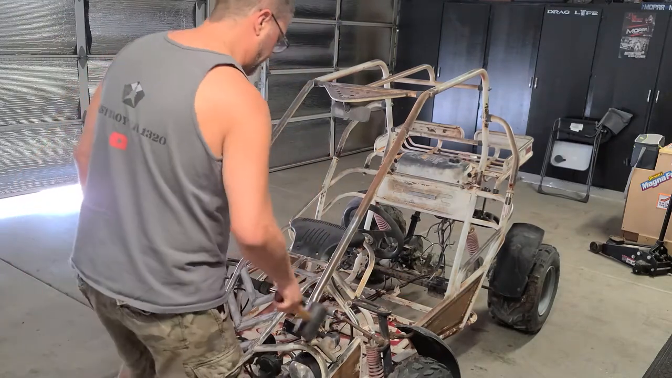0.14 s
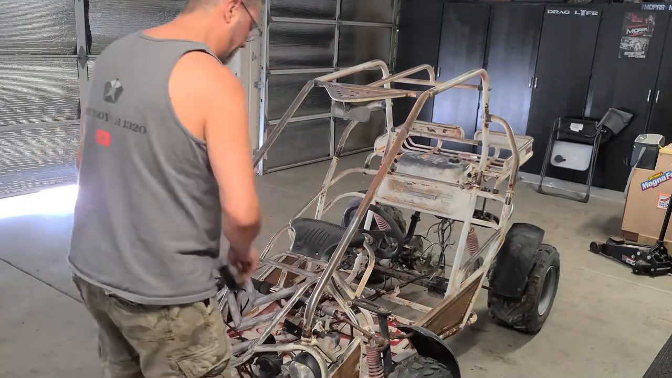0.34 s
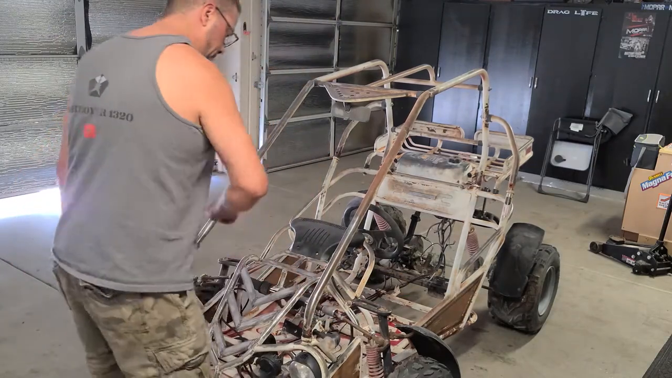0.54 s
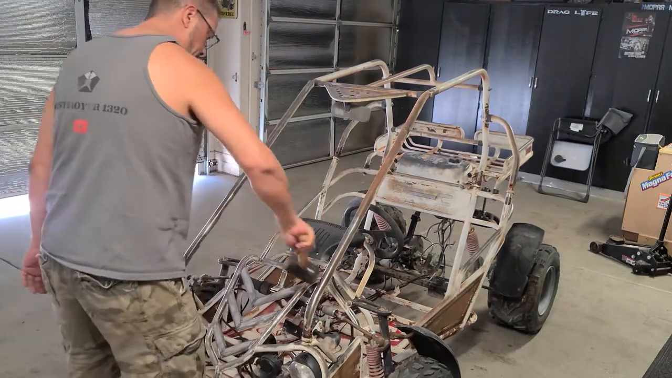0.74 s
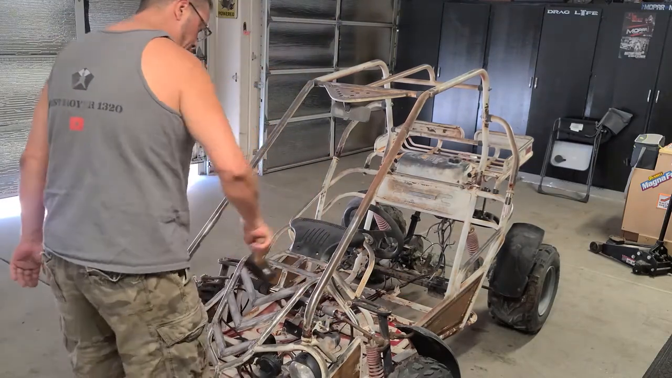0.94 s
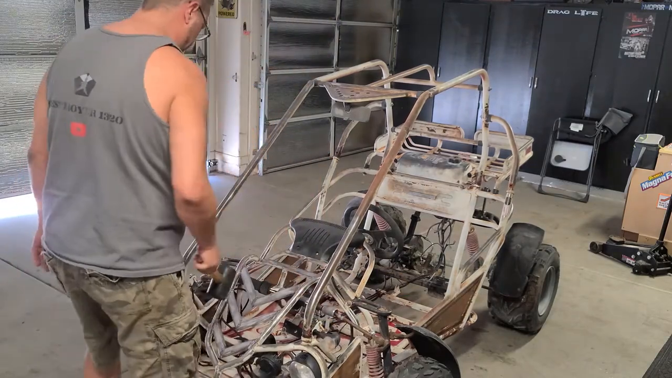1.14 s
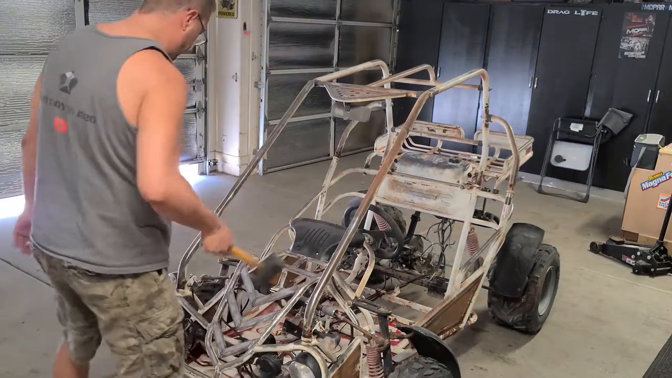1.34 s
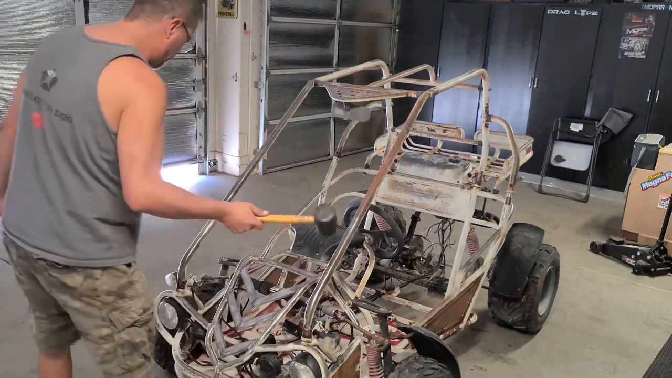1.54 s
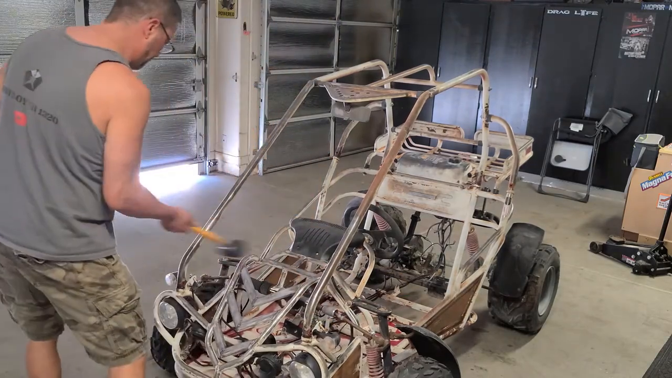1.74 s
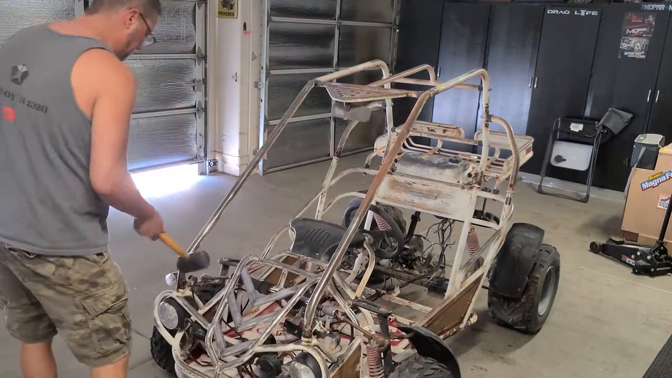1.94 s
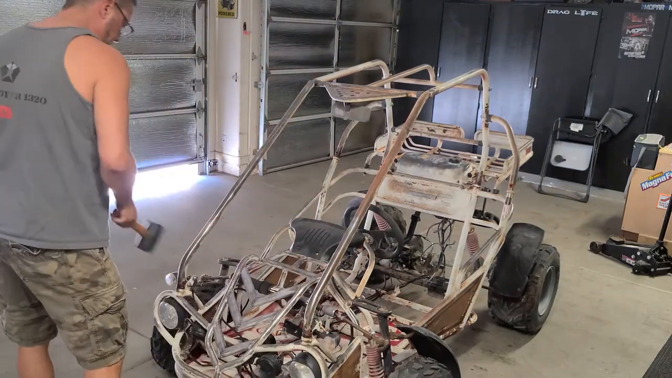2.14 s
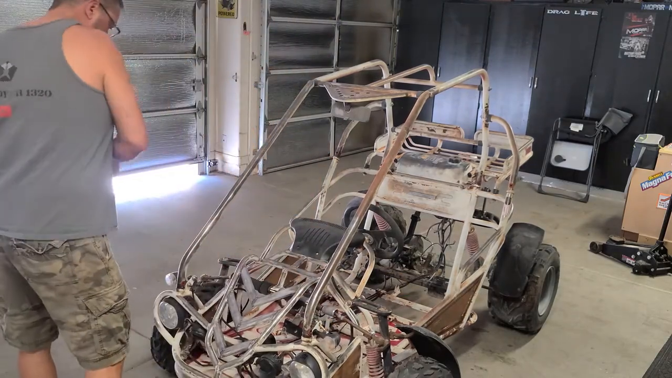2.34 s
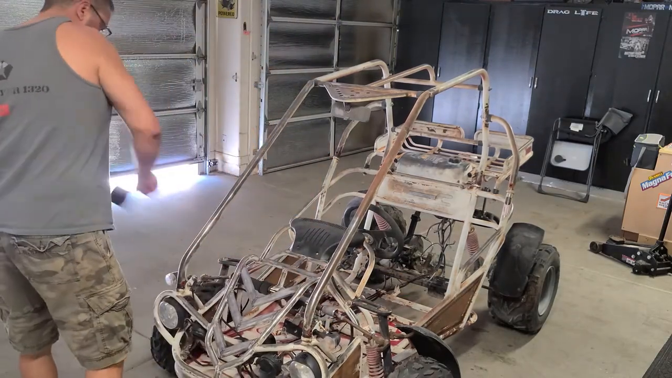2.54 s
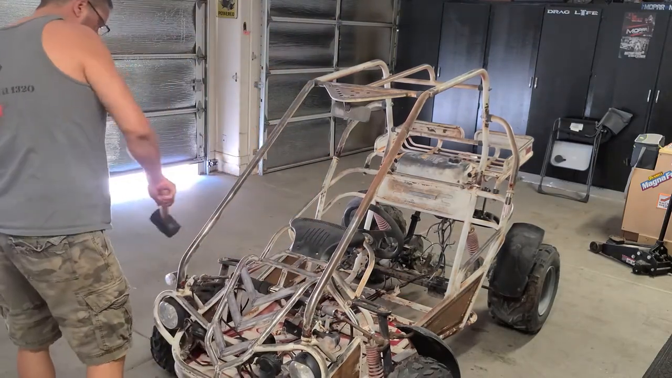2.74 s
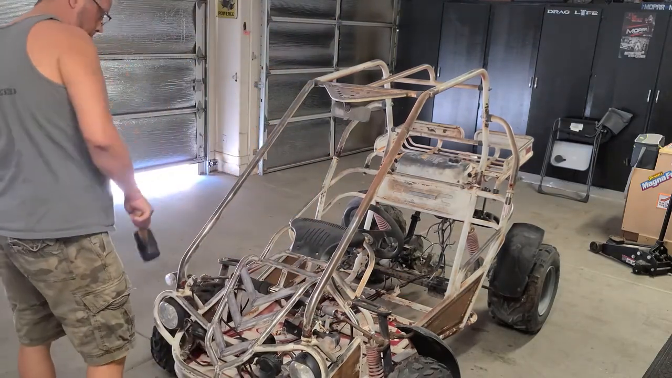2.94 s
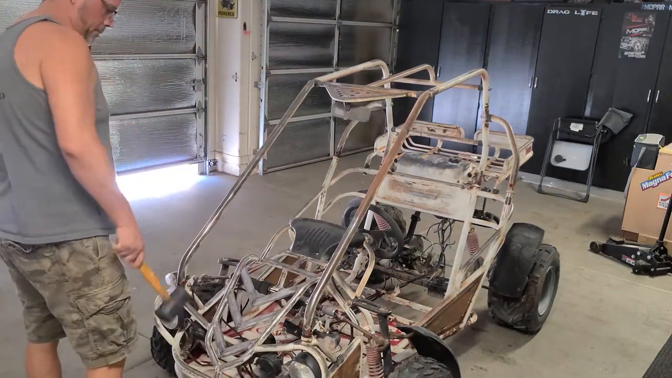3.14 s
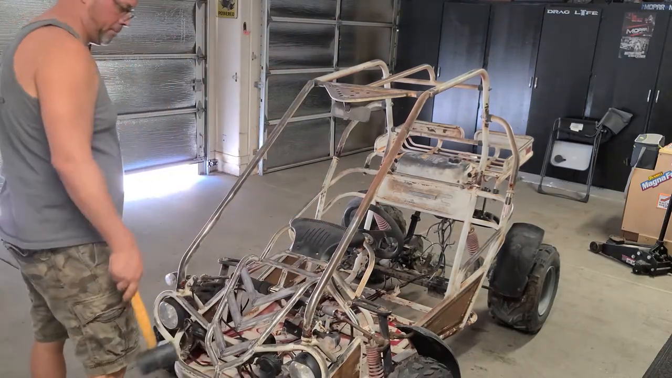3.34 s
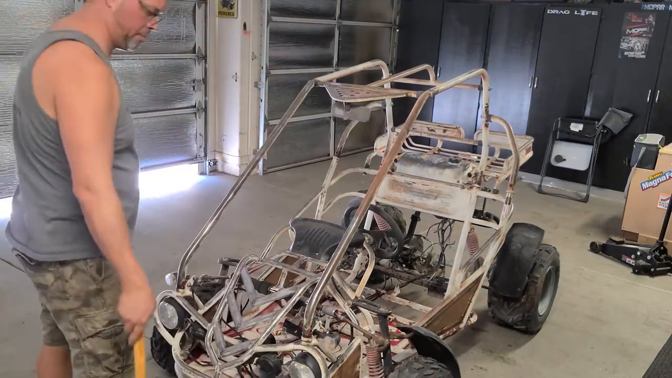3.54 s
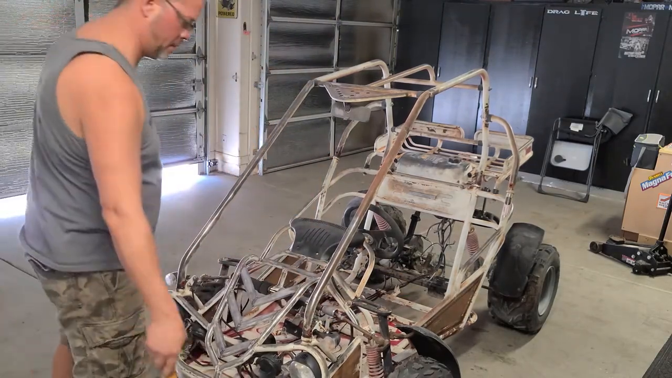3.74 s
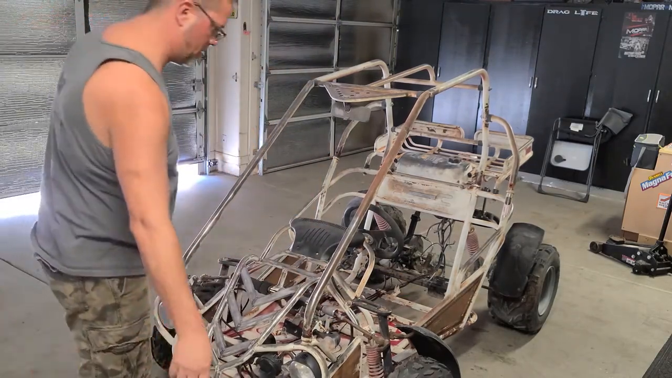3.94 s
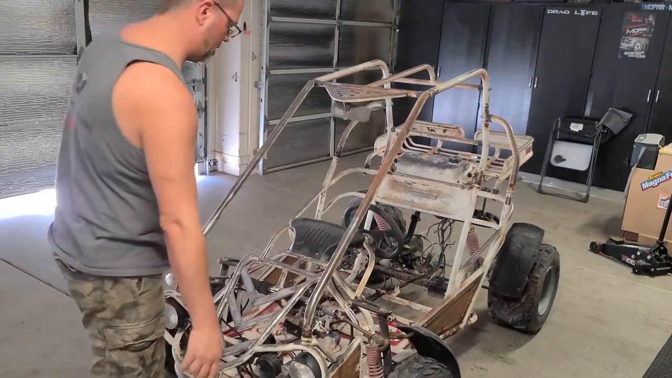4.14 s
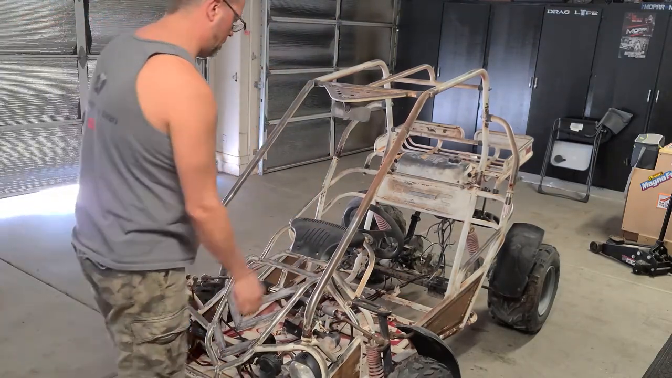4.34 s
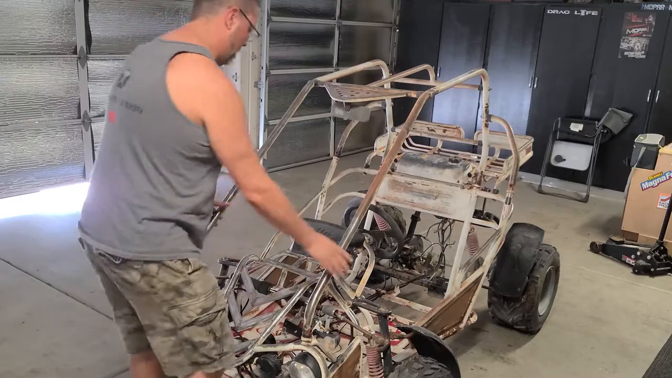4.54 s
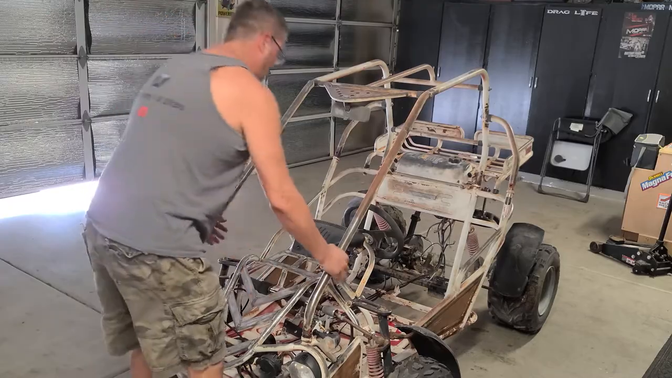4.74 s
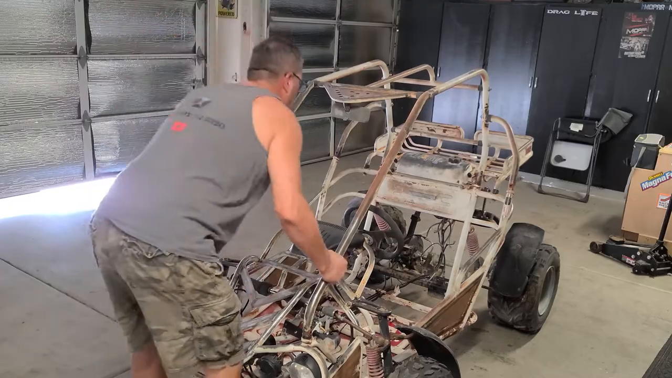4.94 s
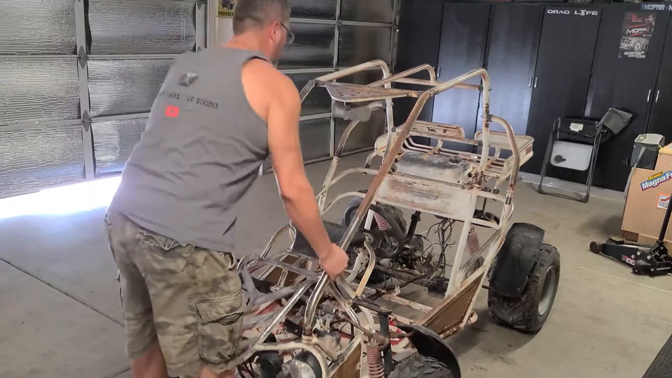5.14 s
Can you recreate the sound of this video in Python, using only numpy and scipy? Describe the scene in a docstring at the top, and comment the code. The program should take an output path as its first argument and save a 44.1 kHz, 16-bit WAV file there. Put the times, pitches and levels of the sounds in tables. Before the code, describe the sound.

Hard, hollow metallic clangs ring through a concrete garage over a fan's hum, followed by duller knocks, soft steps and a small squeak.

```python
"""In a closed garage, a rubber mallet hits the welded tube frame of a buggy; the first blow is already dying away.
Each blow mixes bursts of shaped noise (tick, crack, clatter, shimmer, thud) with beating sine tones for the tubes.
Fading noise makes the room's answer, and an automatic gain control sinks after each blow and creeps back.
Short noises make shoe scuffs, soft steps and the knocks of the mallet put down; a few sines make a faint squeak.
Behind it all are steady noises: a fan's rush and whine and a low rumble."""
import sys
import numpy as np
from scipy import signal
from scipy.fft import rfft, irfft, next_fast_len
from scipy.io import wavfile
from scipy.ndimage import uniform_filter1d

SR = 44100
rng = np.random.default_rng(int(sys.argv[2]) if len(sys.argv) > 2 else 0)


def master(y):
    """Save y as 16-bit WAV."""
    cut = np.clip(np.atleast_2d(y).T, -1, 1)
    pcm = np.round(cut * 32767)  # scale
    wavfile.write(sys.argv[1], SR, pcm.astype(np.int16))


N = 228386
LEAD = SR // 4  # samples of sound before time zero

# In every noise colour below, level_db is relative: the noise is scaled to an even strength afterwards.
# colour of the fan's rush: pitch_hz, level_db
FAN_COLOUR = [(50, -24.5), (90, -8.5), (200, -6), (300, -3.5), (370, -5), (520, -3), (700, -12),
              (1000, -14.5), (1400, -15.5), (2050, -17), (2500, -24.5), (4000, -34), (7000, -47.5),
              (16000, -59)]
# colour of the low rumble, also used for footfalls: pitch_hz, level_db
RUMBLE_COLOUR = [(22, -18), (32, -7.5), (44, 3), (60, 1), (85, -14), (130, -5.5), (220, -2), (500, -54)]
# time the garage takes to fall by 60 dB: pitch_hz, t60_s
GARAGE_T60 = [(180, 1), (430, 0.83), (1040, 0.87), (2500, 0.65), (6000, 0.46), (14400, 0.32)]
# likeness of left and right (1 = same, 0 = unrelated) for far sound: pitch_hz, likeness
FAR_LIKENESS = [(60, 0.92), (290, 0.9), (640, 0.52), (1410, -0.034), (3100, 0.11), (15000, -0.12)]
# the same for near sound: pitch_hz, likeness
NEAR_LIKENESS = [(60, 0.34), (300, 1), (700, 0.82), (1500, 0.7), (4400, 0.038), (15000, .1)]
# shoe scuffs; each is strongest after half its length: start_s, level_db, length_s
SCUFFS = [(1.343, -45, 0.047), (1.645, -47.5, 0.22), (3.43, -56, 0.024), (3.738, -47.5, 0.028),
          (4.689, -51, 0.053), (4.922, -60.5, 0.04), (5.138, -48.5, 0.074)]
# colour of a scuff: pitch_hz, level_db
SCUFF_COLOUR = [(1000, -12.5), (3000, 1), (6000, -2), (12000, -3.5), (16000, -10.5)]
# soft footfalls: start_s, level_db
FOOTFALLS = [(3.915, -30), (4.01, -30.5), (4.495, -28.5), (4.915, -41)]
# faint thin squeak: pitch_hz, level_db
SQUEAK = [(6860, -72), (6890, -72), (9485, -73), (12130, -93)]
# mallet put down, hand on the frame: start_s, level_db, tilt_db_per_octave, low_edge_hz, rise_s, t60_s
KNOCKS = [(4.233, -10, -0.74, 40, 0.0007, 0.12), (4.267, -14, 2.5, 60, 0.0013, 0.046),
          (4.483, -18, -1, 251, 0.002, 0.058), (4.768, -31, 2, 200, 0.0025, .05),
          (5.164, -13, -9, 418, 0.011, 0.083)]
# colour of a knock: pitch_hz, level_db
KNOCK_COLOUR = [(40, 1), (80, -8), (130, -8), (220, 9), (360, -1), (520, 1.5), (690, -0.5), (1000, 1),
                (1500, -12.5), (2300, -7.5), (3600, -20), (4900, -20), (8000, -35.5), (15000, -46)]
# colour of the chassis thud: pitch_hz, level_db
THUD_COLOUR = [(35, -33), (70, -9), (125, 11), (170, 6.5), (300, -36.5), (600, -69)]
# mallet blows; each layer shifts the ring or crack level by its own step:
# start_s, ring_db, crack_db, tilt_db_per_octave, striking_spot (0-2), thud_db, thud_peak_s (after start)
BLOWS = [(-0.117, 11.5, 14, -0.5, 0, -18.5, 0.057), (0.7598, 11.5, 8.5, -0.05, 0, -16, .058),
         (1.801, 12, 10.5, -0.27, 1, -18, 0.05), (2.6367, 14, 12, -0.08, 2, -22, 0.049)]
# ringing of the tube frame: pitch_hz, t60_s, first_spot_db, second_spot_db, third_spot_db
FRAME = [(202.9, 0.87, -20, -18, -22), (219.1, 1, -29, -23.5, -24.5), (254.6, 0.97, -19, -23.5, -24),
         (279.2, 0.77, -17.5, -22.5, -19), (292, 0.95, -22.5, -20.5, -20.5), (336.7, 1, -21, -37.5, -21),
         (388.3, 0.93, -19.5, -36, -19), (418, 0.7, -12.5, -17.5, -12.5),
         (430.3, 0.87, -25.5, -22.5, -20.5), (510.3, 0.86, -28.5, -26, -34.5),
         (557.6, 1, -25, -23.5, -24.5), (567.6, 0.55, -17, -10, -41), (597.6, 0.54, -21.5, -18, -12.5),
         (626, 0.69, -17, -19.5, -19.5), (712, 0.81, -51, -24, -29), (757, 0.65, -25, -45, -42),
         (982, 0.93, -29, -33, -31), (1153, .45, -40.5, -20.5, -30), (1197, 0.5, -29.5, -28.5, -30.5),
         (1250, 0.32, -32, -43, -20.5), (1654, .4, -46, -32, -36.5), (1740, 0.37, -36.5, -44, -34),
         (1700, 0.55, -37, -34, -23.5), (2660, 0.28, -32, -24.5, -24), (3180, 0.31, -41.5, -37, -27)]
# colour of the tick at first touch: pitch_hz, level_db
TICK_COLOUR = [(500, -6.5), (2500, 2.5), (6000, -5), (11000, -7), (16000, -4)]
# colour of the crack of contact: pitch_hz, level_db
CRACK_COLOUR = [(60, -43.5), (140, -11), (220, -1.5), (400, 5.5), (650, 3), (1200, 2), (1900, -10.5),
                (3200, -11.5), (6000, -26), (11000, -18.5), (16000, -20)]
# colour of the crowded, short-lived ringing of panels and fittings: pitch_hz, level_db
CLATTER_COLOUR = [(40, -38.5), (90, -22), (145, -17), (205, 3), (440, -9), (650, 6.5), (850, -11),
                  (1300, -10.5), (1900, -2), (2500, -30), (3800, -30), (6000, -19.5), (11000, -21),
                  (16000, -34)]
# how long that clatter lasts: pitch_hz, t60_s
CLATTER_T60 = [(180, 0.054), (500, 0.18), (2000, 0.092), (12000, 0.27)]
# colour of small steel fittings: pitch_hz, level_db
SHIMMER_COLOUR = [(4500, -51.5), (5600, -22), (5880, 2), (6020, -9), (6250, -17), (6760, -15.5),
                  (7200, -17), (7700, -19), (9000, -52.5)]
# colour of a blow as the walls return it: pitch_hz, level_db
WASH_COLOUR = [(40, -36.5), (90, -16.5), (145, -17), (200, -2), (420, 0), (610, -1), (850, -6), (1250, -5),
               (1500, -8.5), (1900, -7.5), (3300, -17.5), (6000, -23), (11000, -25), (16000, -31)]

FAN_DB, RUMBLE_DB = -36.5, -44.5
FAN_WHINE_HZ, FAN_WHINE_DB = 923.5, -46.5
FOOTFALL_RISE_S, FOOTFALL_T60_S = 0.0049, 0.45
# gain control: loud sound is held to the limit, then the gain creeps back
LIMIT_DB, RECOVERY_DB_PER_S = -6.0, 4.5
DETECTOR_S, LOOK_AHEAD_S = 0.031, 0.0083
CUTOFF_HZ = 15900


def from_db(db):
    """Turn decibels into a gain."""
    return 10 ** (np.asarray(db) / 20)


def at_hz(points, hz):
    """Read a table between its points, with pitch spaced evenly by octave."""
    point_hz, value = np.transpose(points)
    return np.interp(np.log(hz), np.log(point_hz), value)


def seconds(length_s):
    """Make a time axis of the given length."""
    return np.arange(int(length_s * SR)) / SR


def silence():
    """Make an empty stereo track, lead-in included."""
    return np.zeros((2, LEAD + N))


def decay(t, t60_s):
    """Fade steadily, losing 60 dB in t60_s."""
    return np.exp(-np.log(1000) * t / t60_s)


def add(track, start_s, sound):
    """Mix a sound into the track at its start time."""
    at = max(LEAD + round(start_s * SR), 0)
    part = sound[:, :max(track.shape[1] - at, 0)]
    track[:, at:at + part.shape[1]] += part


def noise(colour, likeness, size, tilt_db=0):
    """Stereo noise scaled to rms 1, then tilted about 1 kHz; likeness sets how much the sides share."""
    padded = next_fast_len(size, True)
    hz = np.maximum(np.fft.rfftfreq(padded, 1 / SR), 1)
    gain = from_db(at_hz(colour, hz))
    gain = gain / np.sqrt(2 * np.mean(gain ** 2))
    # the tilt stays level below 250 Hz
    gain = gain * from_db(tilt_db * np.log2(np.maximum(hz, 250) / 1000))
    alike = np.clip(at_hz(likeness, hz), -.99, .99)
    mid, side = rfft(rng.standard_normal((2, padded)))
    shared = np.sqrt(1 + alike) * mid
    opposed = np.sqrt(1 - alike) * side * [[1], [-1]]
    return irfft(gain * (shared + opposed), padded)[:, :size]


def dying(sound, t60_table, count=6):
    """Split a sound into overlapping pitch bands that each die at their own rate."""
    t, spectrum = np.arange(sound.shape[1]) / SR, rfft(sound)
    centres_hz = np.geomspace(180, 14400, count)
    log_hz = np.log(np.maximum(np.fft.rfftfreq(len(t), 1 / SR), 1))
    out = np.zeros_like(sound)
    for share, centre_hz in zip(np.eye(count), centres_hz):
        weight = np.interp(log_hz, np.log(centres_hz), share)
        out += irfft(spectrum * weight, len(t)) * decay(t, at_hz(t60_table, centre_hz))
    return out


def bunched(colour, ripple_db=3.0, count=240):
    """Crowded modes bunch at random into small peaks and dips; the ripple grows with pitch up to 1 kHz."""
    hz = np.geomspace(40, 16000, count)
    ripple = ripple_db * np.minimum(hz / 1000, 1) * np.clip(rng.standard_normal(count), -2, 2)
    return np.column_stack([hz, at_hz(colour, hz) + ripple])


def garage(t, colour, tilt_db=0, first_wall_s=0.0078, build_s=0.011):
    """Blurred reflections from concrete and steel doors start late and build up; the top treble dies first."""
    tail = dying(noise(colour, FAR_LIKENESS, len(t), tilt_db), GARAGE_T60)
    return tail * (1 - np.exp(-np.maximum(t - first_wall_s, 0) / build_s))


def background(whine_width_hz=18):
    """A fan's steady rush and wavering whine (noise through a narrow filter) over the room's low rumble."""
    size = LEAD + N
    b, a = signal.iirpeak(FAN_WHINE_HZ, FAN_WHINE_HZ / whine_width_hz, SR)
    whine = signal.lfilter(b, a, rng.standard_normal((2, size)))
    rush = from_db(FAN_DB) * noise(FAN_COLOUR, FAR_LIKENESS, size)
    rumble = from_db(RUMBLE_DB) * noise(RUMBLE_COLOUR, FAR_LIKENESS, size)
    return rush + rumble + from_db(FAN_WHINE_DB) * whine / whine.std()


def footfalls():
    """Each step is a soft low thump that swells quickly and dies away."""
    out, t = silence(), seconds(.5)
    envelope = (1 - np.exp(-t / FOOTFALL_RISE_S)) * decay(t, FOOTFALL_T60_S)
    for start_s, level_db in FOOTFALLS:
        add(out, start_s, from_db(level_db) * envelope * noise(RUMBLE_COLOUR, FAR_LIKENESS, len(t)))
    return out


def scuffs(room_db=10):
    """Soles hiss briefly on the concrete; a longer scuff puts more energy into the room."""
    out, t = silence(), seconds(.3)
    for start_s, level_db, length_s in SCUFFS:
        stroke = 2 * t / length_s * np.exp(1 - 2 * t / length_s)
        near = noise(SCUFF_COLOUR, FAR_LIKENESS, len(t)) * stroke
        far = np.sqrt(length_s) * garage(t, SCUFF_COLOUR)
        add(out, start_s, from_db(level_db) * near)
        add(out, start_s + length_s / 2, from_db(level_db + room_db) * far)
    return out


def squeak(centre_s=5.03, half_length_s=0.074):
    """A few thin tones swell and stop as the hand takes hold of the frame."""
    t = np.arange(-LEAD, N) / SR
    swell = np.exp(-((t - centre_s) / half_length_s) ** 4)
    return swell * sum(from_db(level_db) * np.sin(2 * np.pi * hz * t) for hz, level_db in SQUEAK)


def knocks(room_db=0.0):
    """Dead knocks are short fading noises; a longer one puts more energy into the room."""
    out, t = silence(), seconds(0.55)
    for start_s, level_db, tilt_db, low_edge_hz, rise_s, t60_s in KNOCKS:
        colour = bunched(KNOCK_COLOUR)
        envelope = (1 - np.exp(-t / rise_s)) * decay(t, t60_s)
        near = noise(colour, NEAR_LIKENESS, len(t), tilt_db) * envelope
        far = from_db(room_db) * np.sqrt(t60_s) * garage(t, colour, tilt_db)
        low_cut = signal.butter(4, low_edge_hz, "high", fs=SR, output="sos")
        add(out, start_s, from_db(level_db) * signal.sosfilt(low_cut, near + far))
    return out


def chassis():
    """The heavy chassis answers each blow with a low thud that swells and dies slowly."""
    out, t = silence(), seconds(.5)
    for start_s, *_, thud_db, peak_s in BLOWS:
        swell = (t / peak_s * np.exp(1 - t / peak_s)) ** 2
        add(out, start_s, from_db(thud_db) * swell * noise(THUD_COLOUR, NEAR_LIKENESS, len(t)))
    return out


def tubes(t, spot, swell_s=0.011, port_phase=0.42, twin_db=-7, split_hz=9):
    """The frame's clear modes ring; where the mallet lands decides how strongly each one does."""
    out = np.zeros((2, len(t)))
    for hz, t60_s, *spot_db in FRAME:
        # shorter waves reach the two microphone ports further out of step (phase in radians)
        lag = port_phase * min(hz / 450, 3) * rng.choice([-1, 1]) * np.array([[1], [-1]])
        # a tube bends in two planes at slightly different pitches, so each mode beats
        twin_hz = hz + split_hz * rng.uniform(0.548, 1.898) * rng.choice([-1, 1])
        main = np.sin(2 * np.pi * (hz * t + rng.random()) + lag)
        twin = from_db(twin_db) * np.sin(2 * np.pi * (twin_hz * t + rng.random()) - lag)
        level_db = np.interp(spot, np.arange(3), spot_db)
        out += from_db(level_db) * decay(t, t60_s) * (main + twin)
    return out * (1 - np.exp(-t / swell_s))


def crack(tilt_db, press_s=0.0097, width_s=0.004):
    """The head presses into the tube for some milliseconds while loose metal chatters under it."""
    t = np.arange(SR // 20) / SR
    pressure = np.exp(-((t - press_s) / width_s) ** 2 / 2)
    return noise(CRACK_COLOUR, NEAR_LIKENESS, len(t), tilt_db) * pressure


def blows(tick_db=-22.0, tick_t60_s=0.038, touch_s=.0035, crack_gain_db=-9.0, clatter_db=-14, tubes_db=2.0,
          shimmer_db=-34, shimmer_t60_s=0.59, wash_db=-12):
    """Each blow: a tick at first touch, the crack, clattering panels, ringing tubes and fittings, then the room."""
    out, t = silence(), seconds(.8)
    for start_s, ring_db, crack_db, tilt_db, spot, *_ in BLOWS:
        tick = noise(TICK_COLOUR, NEAR_LIKENESS, len(t), tilt_db) * decay(t, tick_t60_s)
        clatter = dying(noise(bunched(CLATTER_COLOUR), NEAR_LIKENESS, SR // 3, tilt_db), CLATTER_T60)
        shimmer = noise(SHIMMER_COLOUR, NEAR_LIKENESS, len(t)) * decay(t, shimmer_t60_s)
        wash = garage(t, bunched(WASH_COLOUR), tilt_db)
        # the touch begins just before the ringing
        add(out, start_s - touch_s, from_db(crack_db + tick_db) * tick)
        add(out, start_s - touch_s, from_db(crack_db + crack_gain_db) * crack(tilt_db))
        add(out, start_s, from_db(ring_db + clatter_db) * clatter)
        add(out, start_s, from_db(ring_db + tubes_db) * tubes(t, spot))
        add(out, start_s, from_db(ring_db + shimmer_db) * shimmer)
        add(out, start_s, from_db(ring_db + wash_db) * wash)
    return out


def gain_control(sound):
    """A loud sound pushes the gain down at once; it recovers at a steady rate, so the fan sinks and swells back."""
    power = uniform_filter1d(np.mean(sound ** 2, axis=0), max(int(DETECTOR_S * SR), 1))
    excess_db = np.maximum(10 * np.log10(np.maximum(power, 1e-12)) - LIMIT_DB, 0)
    t = np.arange(len(power)) / SR
    # the deepest cut so far, less what has been recovered since
    recovered_db = RECOVERY_DB_PER_S * t
    cut_db = np.maximum.accumulate(excess_db + recovered_db) - recovered_db
    return sound * from_db(-np.interp(t + LOOK_AHEAD_S, t, cut_db))


def scene(left_db=0.3):
    """Everything leans a little to the left; the gain is already down from the first blow."""
    sound = background() + footfalls() + scuffs() + squeak() + knocks() + chassis() + blows()
    leaning = sound * from_db([[left_db], [-left_db]])
    return gain_control(leaning)[:, LEAD:]


def record(dry, ceiling=1.0):
    """The loudest peaks are flattened smoothly and the top treble is cut."""
    rounded = dry / (1 + (dry / ceiling) ** 6) ** (1 / 6)
    treble_cut = signal.ellip(10, .1, 70, CUTOFF_HZ, fs=SR, output="sos")
    return signal.sosfilt(treble_cut, rounded)


dry = scene()
out = record(dry)
master(out)
```